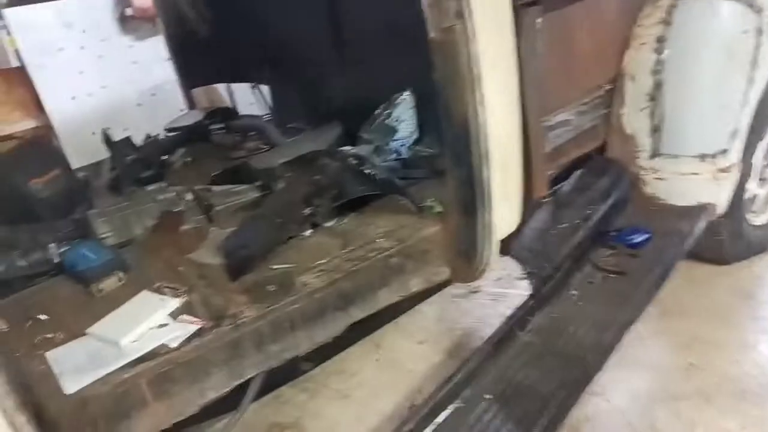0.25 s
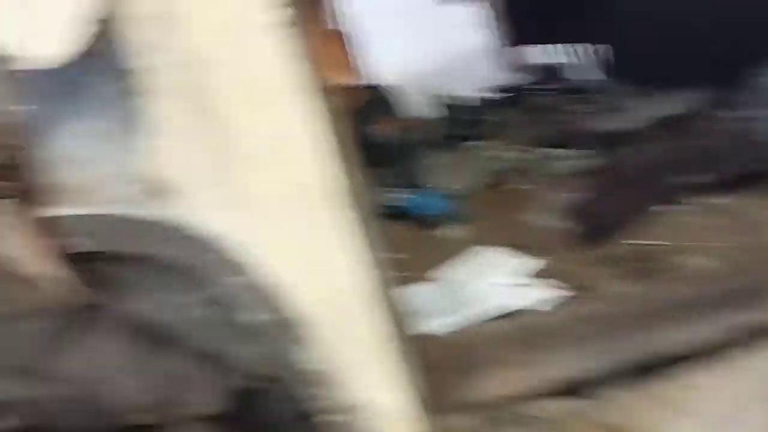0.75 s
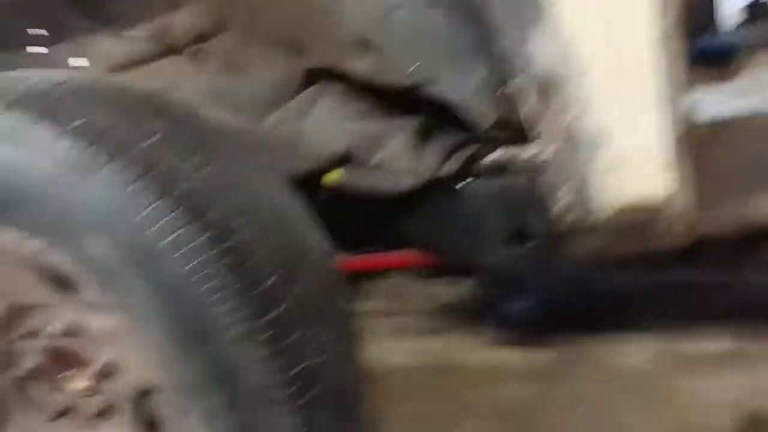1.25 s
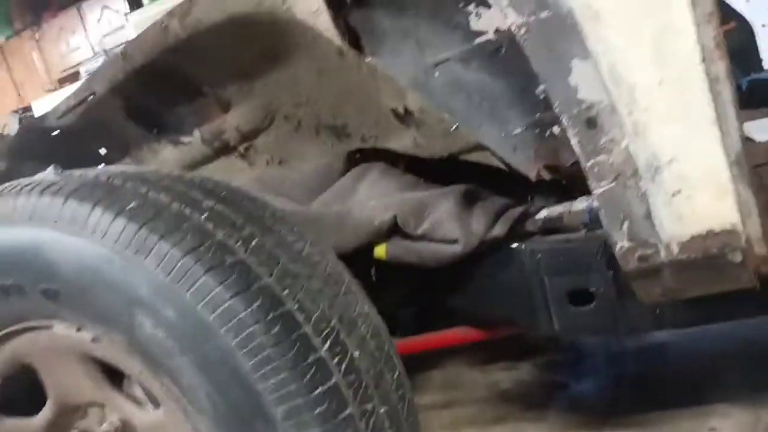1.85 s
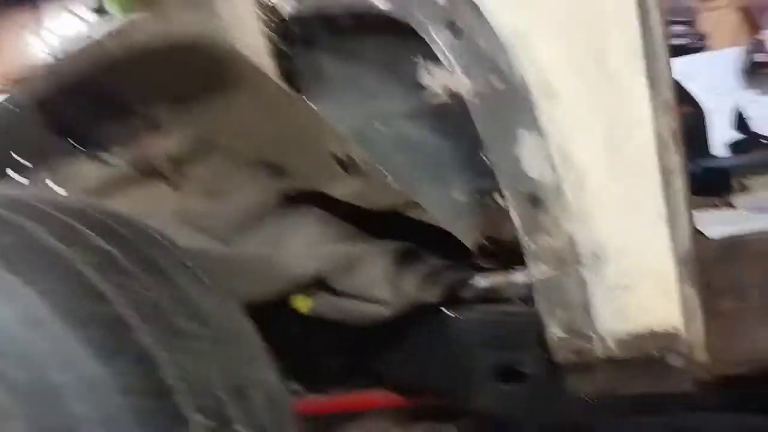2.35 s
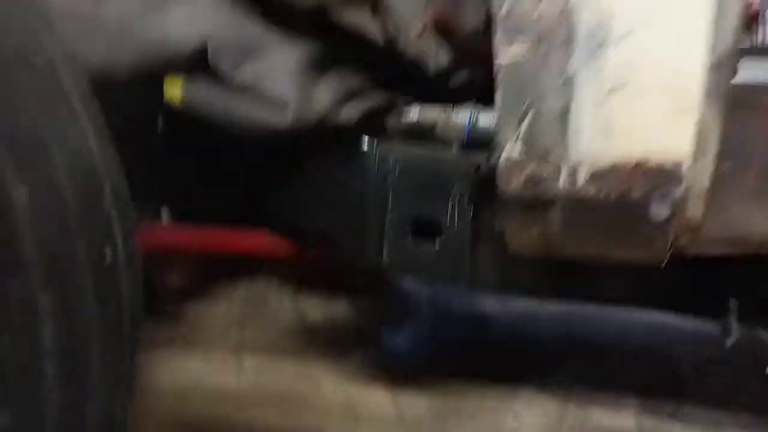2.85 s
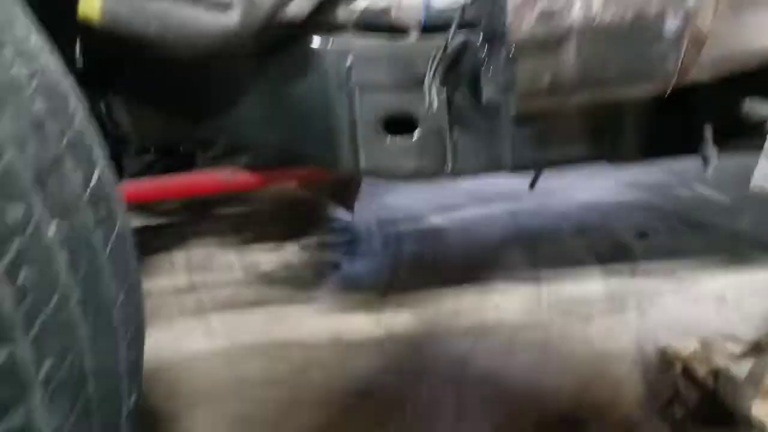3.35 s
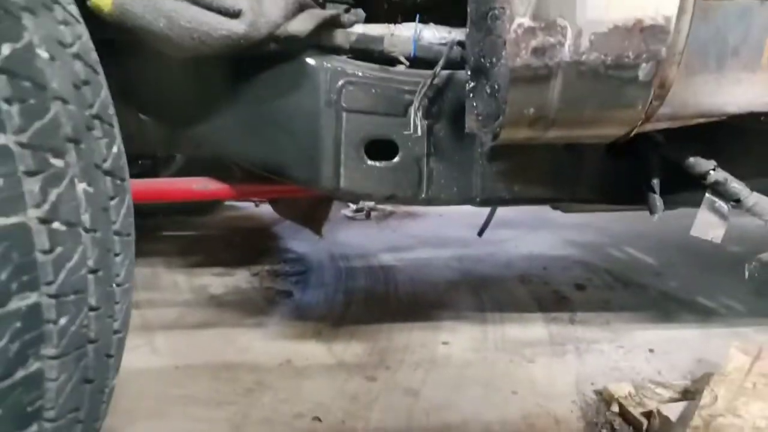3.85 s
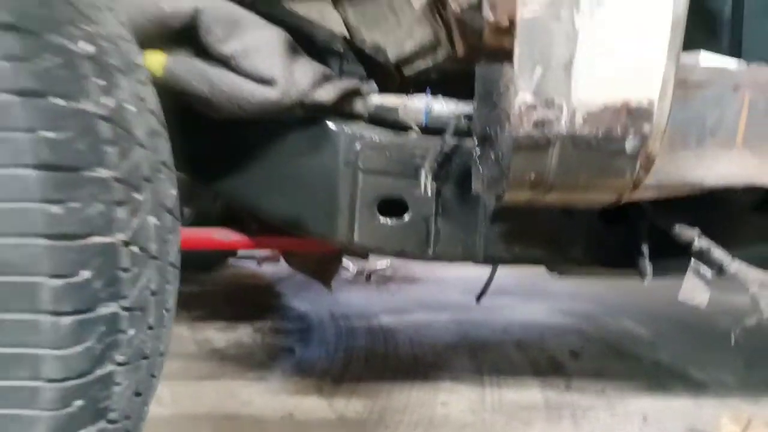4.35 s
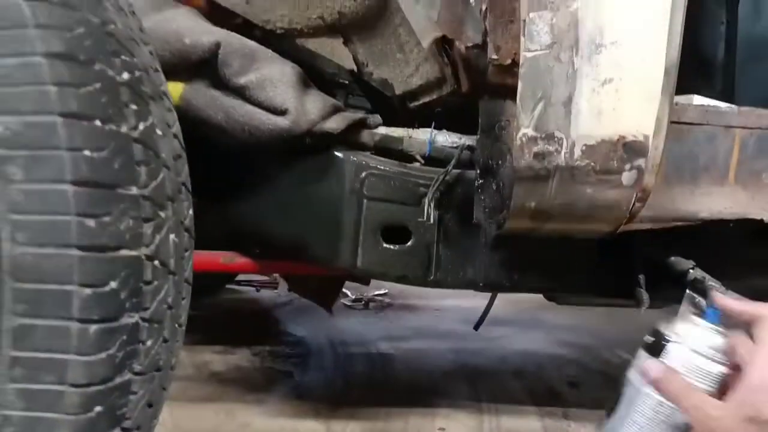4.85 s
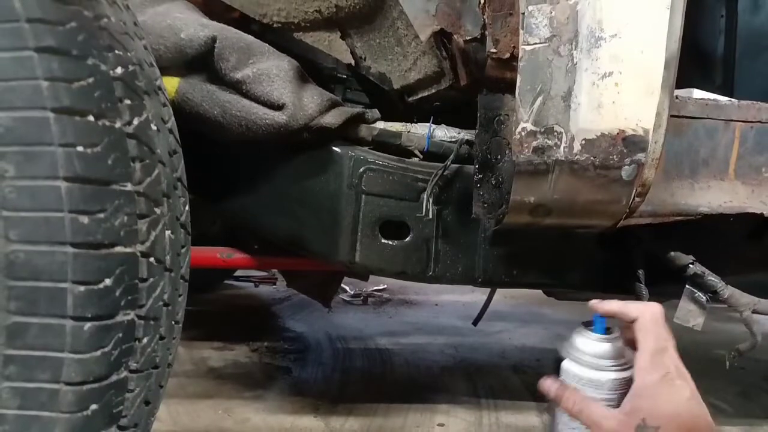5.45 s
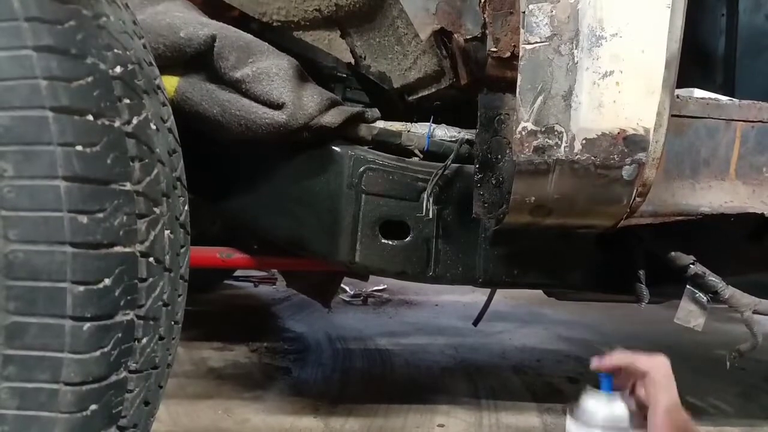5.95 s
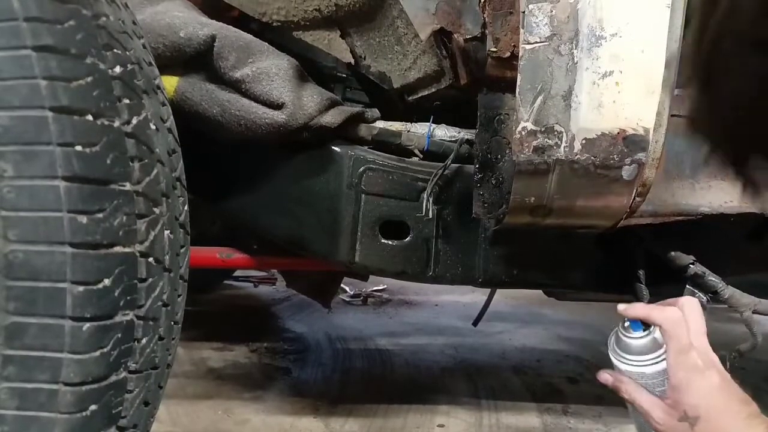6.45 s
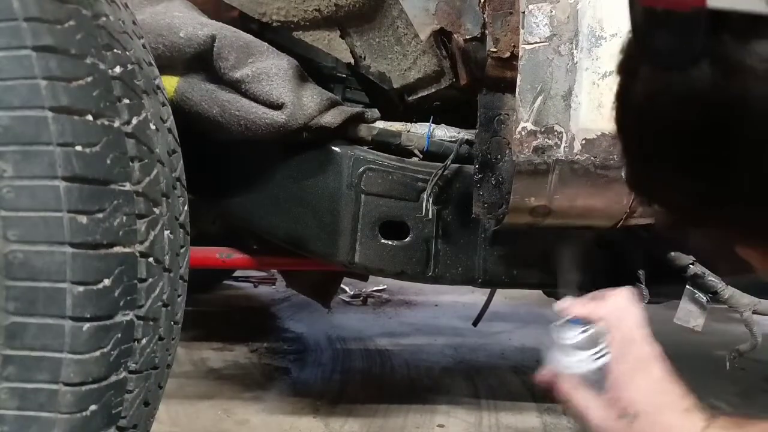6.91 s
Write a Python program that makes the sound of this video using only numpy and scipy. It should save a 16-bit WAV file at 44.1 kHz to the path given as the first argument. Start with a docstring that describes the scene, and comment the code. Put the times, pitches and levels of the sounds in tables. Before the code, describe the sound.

An aerosol can is handled and shaken near the microphone. Hard, quickly damped steel clacks come irregularly, joined by scuffs, dull bumps and a brief singing of rubbed metal. The shaking peaks in a dense rattle, thins to light ticks and a quickening bounce, then pauses. Two crisp spray bursts follow, with low rumble and motor hum in a small, short-echoing garage.

```python
"""In a garage an aerosol paint can is shaken: its mixing ball clacks and rolls around the steel shell.
Each strike or roll is noise passed through the shell's resonances, which sloshing paint retunes.
Close by, rough noise and hollow resonances make scrapes and bumps, and wavering tones squeak and sing.
Then the nozzle hisses in short bursts of coloured noise, doubled by the echo of a panel.
A motor hums in the background, two wavering tones over low rumble and faint hiss."""
import sys
import numpy as np
from scipy import signal
from scipy.fft import rfft, irfft, next_fast_len
from scipy.io import wavfile
from scipy.ndimage import uniform_filter1d, map_coordinates

SR = 44100
rng = np.random.default_rng(int(sys.argv[2]) if len(sys.argv) > 2 else 0)


def bounce(signal):
    """Save signal as a 16-bit WAV file at the path given by the first command-line argument."""
    frames = np.transpose(np.atleast_2d(signal))
    limited = np.clip(frames, -1, 1)
    pcm = np.round(limited * 32767).astype(np.int16)
    wavfile.write(sys.argv[1], SR, pcm)


N = 316638  # length in samples

# resonances of the steel shell before paint and striking spot change them: pitch_hz, width_hz, level_db
SHELL_MODES = [(1846, 102, 6), (2216, 500, 2), (3001, 590, 4.5), (3522, 123, 2), (3869, 227, 7),
               (4310, 340, 0), (4897, 410, 1.5), (5790, 540, -3.5), (6685, 1230, 6), (7176, 500, 9),
               (7870, 710, -14.5), (8500, 8000, -3)]
# low, middle and high groups of shell resonances: from_hz, to_hz
MODE_GROUPS = [(1200, 2550), (2650, 5800), (5800, 17000)]
# resonances heard in rasping and knocking: pitch_hz, width_hz, level_db
RASP_MODES = [(504, 22, 9), (659, 160, 14.5), (822, 78, 19.5), (1160, 300, 5.5), (1400, 94, 6),
              (1950, 250, 6.5)]


def amp(db):
    """Turn decibels into a gain."""
    return 10 ** (np.asarray(db) / 20)


def unit(x):
    """Scale to an rms level of 1."""
    return x / np.sqrt(np.mean(x ** 2) + 1e-20)


def along(points, hz):
    """Read a curve of (pitch in Hz, value) points, evenly spaced by musical interval."""
    point_hz, values = np.transpose(points)
    return np.interp(np.log(hz + 1), np.log(point_hz + 1), values)


def curves(rows):
    """Join timed rows into one smooth curve for each column after the time."""
    times, *columns = np.transpose(rows)
    return [np.interp(np.arange(N) / SR, times, column) for column in columns]


def wobble(rate):
    """A smooth random curve with `rate` random points a second."""
    coarse = np.arange(0, N + 16, 16)  # worked out every 16 samples
    knots = rng.standard_normal(int(N * rate / SR) + 4)
    return np.interp(np.arange(N), coarse, map_coordinates(knots, [coarse * rate / SR]))


def filtered(x, response):
    """Shape x with a gain that depends on frequency."""
    n = x.shape[-1]
    padded = next_fast_len(n + min(n // 8, 8192), real=True)
    return irfft(rfft(x, padded) * response(np.fft.rfftfreq(padded, 1 / SR)), padded)[..., :n]


def resonances(modes, f):
    """Add up resonances that ring after a push: (pitch_hz, width_hz, level_db)."""
    return sum(amp(db) * 1j * f * w / (hz * hz - f * f + 1j * f * w) for hz, w, db in modes)


def band(x, lo_hz, hi_hz, order=4):
    """Keep mainly the frequencies between two limits."""
    limits = [lo_hz, min(hi_hz, SR / 2 - 1)]
    return signal.sosfilt(signal.butter(order, limits, 'band', fs=SR, output='sos'), x)


def pair(alike, size=N):
    """White noise at two microphones that share part of it; alike is their correlation."""
    a, b = rng.standard_normal((2, size))
    turn = np.arccos(np.clip(alike, -1, 1)) / 2
    return np.cos(turn) * a + np.array([[1], [-1]]) * np.sin(turn) * b


def rush(spectrum, alike):
    """Coloured stereo noise with an rms level of 1."""
    return unit(filtered(pair(alike), lambda f: amp(along(spectrum, f))))


def patchy(x, depth_db, hz_size=4, time_size=50):
    """Colour that drifts: slow random peaks and dips over frequency, brought to an rms level of 1."""
    spectrum = signal.stft(x, nperseg=512)[2]
    field = rng.standard_normal(spectrum.shape[1:])
    for axis, size in ((0, hz_size), (1, time_size), (1, time_size // 4)):
        field = uniform_filter1d(field, size, axis, mode='wrap')
    gain = amp(depth_db * unit(field))
    gain /= np.sqrt(np.mean(gain ** 2, axis=0))
    return unit(signal.istft(spectrum * gain, nperseg=512)[1][:, :N])


def swell(start_s, length_s, rise, fall):
    """Gain that climbs to 1 at start_s, holds, then dies; slopes in dB a second."""
    gain = np.zeros(N)
    ends_s = np.array([start_s - 80 / rise, start_s + length_s + 80 / fall])  # silent beyond 80 dB down
    first, last = np.clip(ends_s * SR, 0, N).astype(int)
    t = np.arange(first, last) / SR
    before = np.maximum(start_s - t, 0)
    after = np.maximum(t - start_s - length_s, 0)
    gain[first:last] = amp(-rise * before - fall * after)
    return gain


def swells(rows, rise, fall):
    """For (start_s, length_s, level_db, ..) rows, one gain curve per level; the strongest event rules."""
    gains = np.zeros((len(rows[0]) - 2, N))
    for s, length, *levels in rows:
        gains = np.maximum(gains, amp(levels)[:, None] * swell(s, length, rise, fall))
    return gains


def panned(x, left_db):
    """Lean to the left (or right if negative) at constant power."""
    gains = amp(np.array([[.5], [-.5]]) * left_db)
    return x * gains / np.sqrt(np.mean(gains ** 2, axis=0))


def add(track, s, sound):
    """Mix a sound in at time s."""
    start = max(round(s * SR), 0)
    track[:, start:start + sound.shape[1]] += sound[:, :N - start]


def clacks(rise=0.00041, t60=0.032, ring_db=-27, ring_t60=0.33, low_db=-3.0, middle_db=-1, high_db=-8,
           pure_db=-1, pure_hz=26, soft_db=0.53, hard_db=-5, alike=0.25, early_s=.0016):
    """Each strike chatters on the shell; paint and hand damp it fast, and the spot struck sets the modes."""
    # ball strikes, levels before each group's shared trim: start_s, treble_db, low_db, middle_db
    strikes = [(0.0196, -40, -24, -28), (0.7495, -12, -25.5, -16), (0.818, -16.5, -45, -27),
               (0.8977, -13, -36, -18.5), (0.9277, -22.5, -33, -25), (1.2293, -14.5, -22, -17.5),
               (1.2662, -19.5, -22.5, -24.5), (1.3137, -15, -25.5, -43), (1.3768, -10.5, -32, -21.5),
               (1.396, -25, -25, -19), (1.5071, -10.5, -29, -15.5), (1.5977, -15, -23.5, -17.5),
               (1.6653, -9.5, -25.5, -13.5), (1.7004, -19, -27.5, -20), (2.15, -10.5, -36, -19),
               (2.2045, -9.5, -18.5, -17), (2.8557, -9.5, -30.5, -26), (2.9618, -19.5, -35, -31),
               (3.0142, -23.5, -34, -36), (3.089, -32, -37.5, -46), (3.124, -29.5, -38.5, -38.5),
               (3.4391, -10, -29, -12.5), (3.8116, -15, -32, -23.5), (3.8317, -17, -30.5, -26.5),
               (4.2013, -1.5, -16.5, -15), (4.2478, -12.5, -20, -24), (4.2924, -18, -26, -29),
               (4.3219, -5, -21, -11.5), (4.3433, -7.5, -22, -13), (4.4321, -8, -21, -24.5),
               (4.4646, -20.5, -24.5, -31), (4.4944, -16, -30.5, -31), (4.5173, -17, -26.5, -32),
               (4.5644, -7, -24, -14), (4.6019, -20, -30, -30), (4.6336, -18.5, -26.5, -28),
               (4.6656, -7, -26, -24.5), (4.7194, -17.5, -27, -29), (4.7958, -15.5, -19, -25),
               (4.8393, -27.5, -25.5, -39), (4.9761, -8, -22.5, -22.5), (5.0388, -16, -20, -27.5),
               (5.1176, -9.5, -28.5, -27), (5.485, -20.5, -38.5, -36.5), (5.5064, -26, -63, -48),
               (5.5212, -28, -54, -48), (5.5524, -14, -34, -30.5), (5.593, -16.5, -48, -43),
               (5.6241, -25, -67, -45), (5.68, -26.5, -62, -40), (5.7033, -25.5, -58, -40),
               (5.766, -15.5, -24, -30), (5.8077, -23.5, -60, -36.5), (5.8651, -19, -44, -37),
               (5.8907, -13.5, -35, -26.5), (6.0297, -33.5, -44, -44)]
    lead = .002  # silence ahead of the blow, s
    out, t = np.zeros((2, N)), np.arange(SR // 8) / SR
    age = np.maximum(t - lead, 0)
    # a fast decay with a faint slower one under it (t60: seconds to fall 60 dB)
    blow = (1 - np.exp(-age / rise)) ** 2 * (amp(-60 * age / t60) + amp(ring_db - 60 * age / ring_t60))
    for s, treble, low, middle in [*strikes, *settling()]:
        modes = struck_modes(s, treble, low, middle)
        # all modes but the broadest have lightly damped twins
        lingering = [(hz, pure_hz, db + pure_db) for hz, _, db in modes[:-1]]
        force = [(7500, 0.044), (13000, soft_db * min(treble - hard_db, 0))]  # gentle strikes are duller
        chatter = pair(alike, size=len(t)) * blow

        def response(f):
            # the modes both take up the blow and radiate it, so the valleys between them are dark
            return resonances([*modes, *lingering], f) * resonances(modes, f) * amp(along(force, f))

        shell = filtered(chatter, response)
        levels = (low + low_db, middle + middle_db, treble + high_db)
        for (lo, hi), db in zip(MODE_GROUPS, levels):
            part = band(shell, lo, hi, order=6)
            opening = part[:, :SR // 70].std(axis=1, keepdims=True)  # level of the first 14 ms
            add(out, s - lead - early_s, amp(db) * part / opening)
    return out


def settling(count=6):
    """Strikes of the ball bouncing to rest, ever quicker and weaker."""
    first_s, flight_s, shrink = 5.922, 0.024, 0.66  # first contact, first flight, each flight over the last
    first_db, loss_db = -17, 2  # first treble level, loss per bounce
    low_db, middle_db = -19.5, -11.5  # relative to the treble
    k = np.arange(count)
    times = first_s + flight_s * (np.cumsum(shrink ** k) - shrink ** k)
    return [(s, db, db + low_db, db + middle_db) for s, db in zip(times, first_db - loss_db * k)]


def struck_modes(s, treble_db, low_db, middle_db):
    """The shell as one strike finds it: blows near the end wake the dome, glancing taps ring the side wall."""
    dome_hz, dome_onset_db, dome_grows = 3080, -14, 1.4  # pitch, blow that wakes it, dB gained per dB of blow
    wall_hz, wall_max_db = 3920, 4  # pitch, largest change under a glancing tap
    hz, width, db = sloshed(s)
    detune, spot = rng.standard_normal((2, len(SHELL_MODES)))

    def near(centre_hz):
        return np.exp(-(np.log(hz / centre_hz) * 10) ** 2)

    dome_db = np.clip(dome_grows * (middle_db - treble_db / 2 - dome_onset_db), -10, 3)
    # a weak lowest mode marks a glancing tap; the wall rises when the dome sinks, and sinks when it rises
    wall_db = np.clip(middle_db - low_db, 0, wall_max_db) * -np.sign(dome_db)
    db = db + 2 * spot + dome_db * near(dome_hz) + wall_db * near(wall_hz) ** 2
    return np.transpose([hz * (1 + 0.017 * detune), width, db])


def sloshed(s):
    """The shell's modes at time s: sloshing paint retunes the lowest most, the middle ones a little."""
    # paint sloshing in the can: time_s, pitch_factor of the lowest mode
    slosh = [(1.7, 1.04), (3.0, 1.15), (3.44, .97), (3.82, 1.14), (4.25, 0.94), (4.8, 1.01), (5.77, 1.07),
             (5.87, 1.1)]
    middle_share = 0.222  # part of the shift that reaches the middle modes
    hz, width, db = np.transpose(SHELL_MODES)
    share = np.where(hz < MODE_GROUPS[0][1], 1, middle_share * (hz < MODE_GROUPS[1][1]))
    return hz * (1 + share * (np.interp(s, *np.transpose(slosh)) - 1)), width, db


def rolling(rough_db=3, pure_hz=30, pure_db=-4):
    """Between strikes the ball skitters along the wall, waking different modes as it travels."""
    # rolls: start_s (at full speed), length_s, level_db
    rolls = [(0, 0.045, -25), (0.707, 0.033, -41.5), (0.765, .11, -23.5), (0.966, 0.11, -35.5),
             (1.236, 0.23, -29.5), (2.888, 0.072, -35.5), (3.357, 0.14, -36), (4.167, 0.081, -35),
             (4.363, .015, -24), (4.43, 0.3, -39)]
    out, skitter = np.zeros((2, N)), pair(0.18) * amp(rough_db * wobble(350))
    tilt = [(5500, 12.5), (7200, 1.5), (12000, -3.5)]  # pitch_hz, level_db
    for s, length, level_db in rolls:
        speed = swell(s, length, rise=324, fall=213)
        moving, modes = speed > 0, np.transpose(sloshed(s))
        lingering = [(hz, pure_hz, db + pure_db) for hz, _, db in modes]

        def response(f):
            return resonances([*modes, *lingering], f) * resonances(modes, f) * amp(along(tilt, f))

        shell = filtered(skitter[:, moving], response)
        out[:, moving] += amp(level_db) * speed[moving] * unit(band(shell, 2000, 13500))
    return out.std() * patchy(out, depth_db=4, hz_size=2, time_size=16)


def spray(sputter_db=1, alike=0.26, patchy_db=3.5):
    """The pressed nozzle hisses and spits as it closes; a panel's echo combs it as the hand sweeps."""
    # colour of the jet: pitch_hz, level_db
    jet_colour = [(1100, -53), (2400, -14.5), (4200, -15), (5400, -5), (7030, -1), (8000, -5),
                  (12200, -20.5), (16000, -22)]
    # echo off a nearby panel: time_s, delay_s, level_db
    panel = [(5.15, .00047, -13), (5.42, 0.00062, -4), (6.83, 0.000704, -20)]
    # presses of the nozzle: start_s (fully open), length_s, level_db
    presses = [(5.16, .245, -35), (6.835, .21, -20.5), (7.16, .2, -20)]
    spit_db, spit_s = 4.5, 0.011  # extra level, half-width of the burst
    jet, t = rush(jet_colour, alike), np.arange(N) / SR
    lag, echo_db = curves(panel)
    jet = jet + amp(echo_db) * np.array([np.interp(t - lag, t, side) for side in jet])
    jet = patchy(jet, patchy_db, hz_size=2, time_size=12)
    spit = sum(np.exp(-((t - s - length) / spit_s) ** 2) for s, length, _ in presses)
    valve = swells(presses, rise=1112, fall=1008)
    return valve * amp(spit_db * spit + sputter_db * wobble(110)) * jet


def scraping(body_db=1, catch_db=2.5):
    """Light scuffs and gritty drags catch unevenly and set a hollow body ringing."""
    # hollow body: pitch_hz, width_hz, level_db
    body_modes = [(156.5, 16, -4.5), (228, 5.9, -4), (242, 25, 1), (330, 24, 9.5), (413, 130, -5)]
    # colour of the grit: pitch_hz, level_db
    grit_colour = [(2300, 0.5), (3200, 4), (4700, -3), (6000, -0.5), (7050, 3.5), (8160, -5),
                   (10100, -12.5), (16000, -32.5)]
    # strokes: start_s (full pressure), length_s, rasp_db, body_db (before the trim body_db), grit_db
    strokes = [(1.42, 0.041, -26, -33.5, -43), (1.79, 0.063, -24, -47, -23),
               (1.845, 0.082, -17.5, -29, -16.5), (1.95, 0.11, -29.5, -40.5, -17.5),
               (2.08, 0.1, -25, -24, -26.5), (2.24, 0.098, -19.5, -21, -26), (2.39, 0.074, -27, -35, -45),
               (2.6, 0.56, -50.5, -84, -48.5)]
    catch = amp(catch_db * wobble(160))
    body = filtered(pair(0.85) * catch, lambda f: resonances(body_modes, f))
    body = unit(band(body, 110, 690))
    rasp = filtered(pair(0.29) * catch, lambda f: resonances(RASP_MODES, f))
    rasp = patchy(band(rasp, 500, 2620), depth_db=0.5, time_size=12)
    grit = band(rush(grit_colour, alike=0), 700, 20000, order=2) * catch
    grit = patchy(grit, depth_db=2.5, hz_size=2, time_size=12)
    rasp_gain, body_gain, grit_gain = swells(strokes, rise=448, fall=291)
    return panned(amp(body_db) * body_gain * body + rasp_gain * rasp + grit_gain * grit, left_db=4.0)


def squeak(rise=130, fall=400, rough_db=5):
    """Faint rubbing sticks and slips on a gliding, ragged pitch; each partial wanders on its own."""
    # squeaks: start_s, length_s, pitch_hz, glide_hz_per_s, level_db
    squeaks = [(1.116, 0.12, 1620, -900, -36.5), (2.861, 0.14, 1092, 300, -45.5)]
    # partials: multiple of the pitch, level_db
    partials = [(1 / 3, 2.9), (0.97, 8.3), (2, 3.5), (3, 4.1)]
    jitter_hz = 110
    out, t = np.zeros(N), np.arange(N) / SR
    for s, length, start_hz, glide, level_db in squeaks:
        hz = start_hz + glide * np.clip(t - s, 0, length)
        tone = 0
        for k, db in partials:
            strength = amp(db + rough_db * wobble(150))
            ragged_hz = k * hz + np.sqrt(k) * jitter_hz * wobble(1400)
            tone = tone + strength * np.sin(2 * np.pi * np.cumsum(ragged_hz) / SR)
        out += amp(level_db) * swell(s, length, rise, fall) * unit(tone)
    return panned(out, left_db=7)


def singing(rise=700, fall=160, waver_hz=45, flutter_db=5):
    """Rubbed metal sings briefly: a few thin steel tones swell, flutter and die away."""
    # steel tones: pitch_hz, level_db
    tones = [(5220, -1), (6210, -2.5), (3820, -3)]
    start_s, length_s, level_db = 2.91, 0.051, -30.5
    tone = 0
    for hz, db in tones:
        strength = amp(db + flutter_db * wobble(50))
        tone = tone + strength * np.sin(2 * np.pi * np.cumsum(hz + waver_hz * wobble(250)) / SR)
    return panned(amp(level_db) * swell(start_s, length_s, rise, fall) * unit(tone), left_db=14)


def ting(rise=900, fall=450):
    """During the scraping a small piece of steel rings thinly, one pure tone, until it is damped."""
    start_s, length_s, pitch_hz, level_db = 2.15, .36, 10680, -51
    tone = np.sin(2 * np.pi * pitch_hz * np.arange(N) / SR)
    return amp(level_db) * swell(start_s, length_s, rise, fall) * tone


def bumps(knock_db=-12, thud_db=-9, knock_t60=0.038, thud_t60=0.072):
    """Knocks of handling: a hollow tock over a dull thud."""
    # knocks, levels before the trims knock_db and thud_db: start_s, knock_db, thud_db
    knocks = [(1.328, -18, -36), (1.349, -21, -41), (1.46, -30.5, -25), (2.058, -20.5, -25),
              (2.223, -26, -27), (2.254, -22.5, -36), (2.313, -15.5, -34), (3.495, -34, -28.5),
              (4.32, -30, -28)]
    out, t = np.zeros((2, N)), np.arange(SR // 6) / SR
    for s, db, low_db in knocks:
        knock = pair(0.057, size=len(t)) * amp(-60 * t / knock_t60)
        knock = band(filtered(knock, lambda f: resonances(RASP_MODES, f)), 455, 2330)
        thud = band(pair(0.4, size=len(t)) * amp(-60 * t / thud_t60), 65, 190, order=3)
        add(out, s, amp(db + knock_db) * unit(knock) + amp(low_db + thud_db) * unit(thud))
    return panned(out, left_db=5.5)


def clicks(t60=0.019):
    """Dry clicks of handling: short fading noise with no ring."""
    # clicks: start_s, level_db (before the fade)
    click_rows = [(3.5007, -14.5), (3.517, -20.5)]
    out, t = np.zeros((2, N)), np.arange(SR // 20) / SR
    for s, db in click_rows:
        noise = unit(band(pair(.5, size=len(t)), 1400, 6400, order=2))
        add(out, s, amp(db - 60 * t / t60) * noise)
    return out


def garage(x):
    """The room's echo: fading noise that dies sooner in the treble."""
    # time to fall 60 dB: pitch_hz, fade_s
    fade = [(3000, 0.28), (15000, 0.1)]
    hz, t, spectrum = signal.stft(rng.standard_normal((2, SR // 2)), SR, nperseg=256)
    tail = signal.istft(spectrum * amp(-60 * t / along(fade, hz)[:, None]), SR, nperseg=256)[1]
    return signal.fftconvolve(x, tail / np.linalg.norm(tail[0]), axes=1)[:, :N]


def background(hum_hz=81.3, octave_db=-6, air_db=-55, lag=0.00058):
    """A motor hum, a wavering tone and its octave, swells and sinks over low rumble and faint hiss."""
    # hum, before a shared trim: time_s, level_db
    hum_level = [(0.8, -65), (1.38, -44.5), (1.82, -64), (3.06, -53.5), (3.3, -44), (4.2, -52),
                 (4.46, -66.5), (6.16, -46), (7.18, -38.5)]
    # rumble: time_s, level_db
    rumble_level = [(0, -52.5), (1.15, -46.5), (4.1, -49), (4.55, -57), (5.6, -52), (6.45, -45.5),
                    (6.95, -34.5), (7.18, -40.5)]
    # colour of the rumble: pitch_hz, level_db
    rumble_colour = [(25, -24), (60, -13), (125, -0.5), (250, -10.5), (430, -10.5), (620, -17),
                     (830, -16.5), (1100, -21.5), (4500, -32), (9000, -61)]
    # colour of the hiss: pitch_hz, level_db
    air_colour = [(300, 1), (2500, 6), (4000, -3), (7000, 11), (12000, -13.5), (16000, -32)]
    turns = np.cumsum(hum_hz + 0.39 * wobble(7.7)) / SR
    phase = 2 * np.pi * (turns + hum_hz * lag * np.array([[0], [1]]))  # the left lags by lag seconds
    tone = amp(2.8 * wobble(12)) * np.sin(phase)
    tone = tone + amp(octave_db + 4 * wobble(14)) * np.sin(2 * phase)
    hum = np.sqrt(2) * amp(curves(hum_level)[0] + 2) * tone
    level = curves(rumble_level)[0]
    rumble = amp(level + 2.1 * wobble(14))
    rumble = rumble * patchy(rush(rumble_colour, alike=0.19), depth_db=3.0, hz_size=2, time_size=12)
    # the hiss follows the rumble's level slightly
    air = amp(air_db + 0.11 * (level - level.mean())) * rush(air_colour, alike=0.35)
    return panned(hum + rumble, left_db=6.5) + panned(air, left_db=7.0)


def reach(x):
    """These nearby sounds arrive at the right microphone first."""
    late = round(0.001143 * SR)  # 1.143 ms later on the left
    return np.array([np.pad(x[0], (late, 0))[:N], x[1]])


def scene():
    """The can is stronger in the left microphone; everything near it echoes a little."""
    # side of the can: time_s, left_minus_right_db
    place = [(0, 7), (1.5, 3), (5.0, 7), (6.0, 11)]
    can = panned(clacks() + rolling() + spray(), curves(place)[0])
    near = reach(can + scraping() + squeak() + singing() + ting()) + bumps() + clicks()
    return near + amp(-15.0) * garage(near) + background()


def record(dry):
    """The two microphones differ in colour; loud peaks are rounded off and the highest treble is cut."""
    # colour of the two microphones: pitch_hz, left_minus_right_db
    ports = [(2000, -1.5), (4200, -1.5), (6400, 8.5), (9500, -6.5), (15000, -15)]
    heard = filtered(dry, lambda hz: panned(0.99, along(ports, hz)))
    rounded = heard / (1 + heard ** 6) ** (1 / 6)
    return filtered(rounded, lambda hz: hz < 16200)


dry = scene()
out = record(dry)
bounce(out)
```